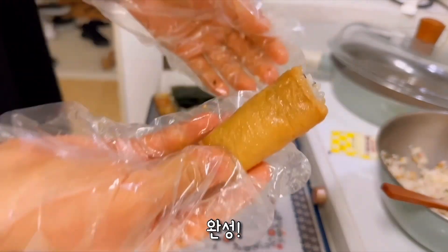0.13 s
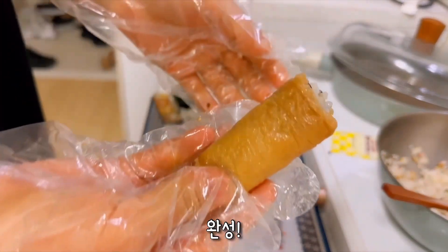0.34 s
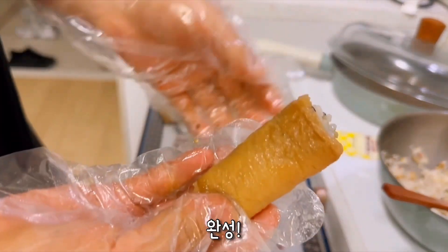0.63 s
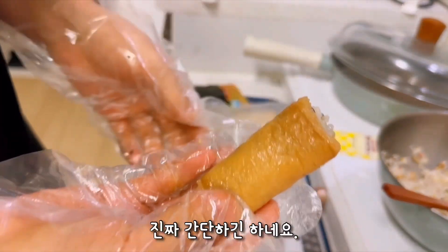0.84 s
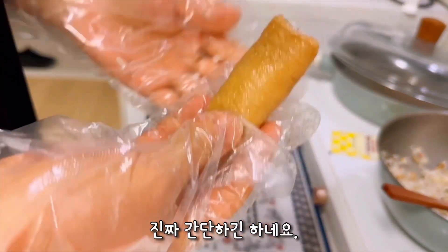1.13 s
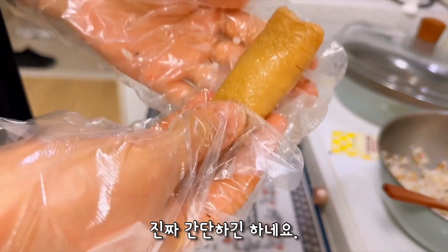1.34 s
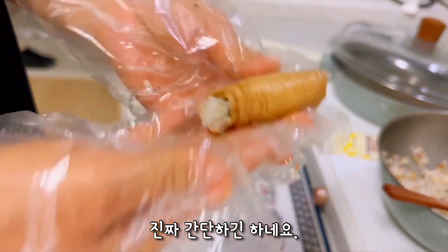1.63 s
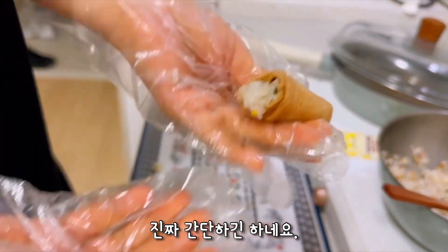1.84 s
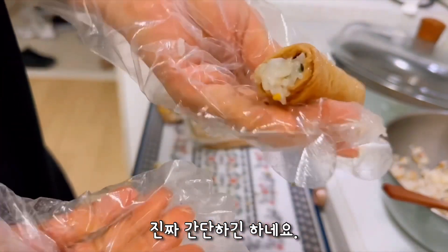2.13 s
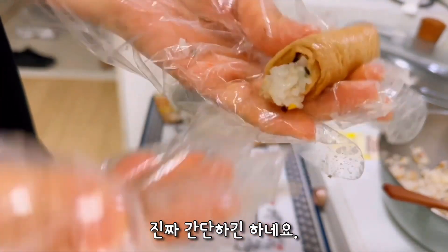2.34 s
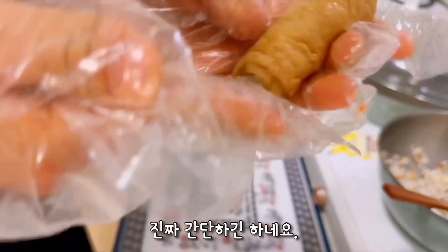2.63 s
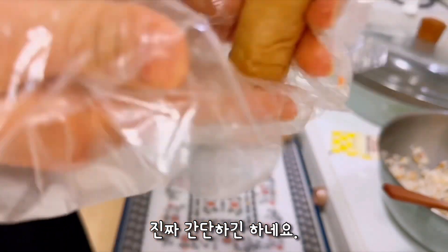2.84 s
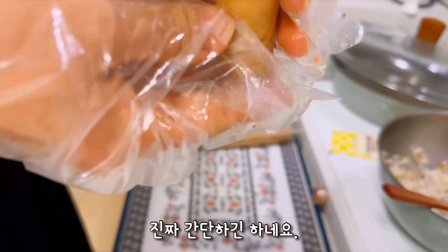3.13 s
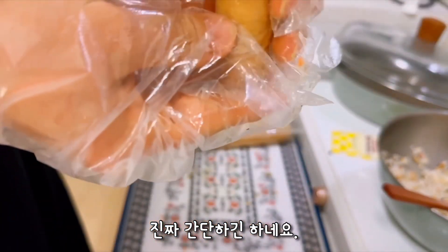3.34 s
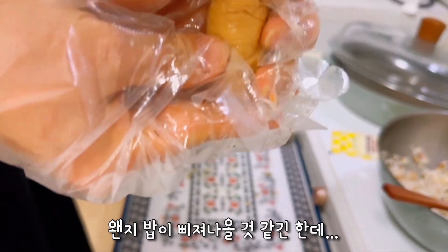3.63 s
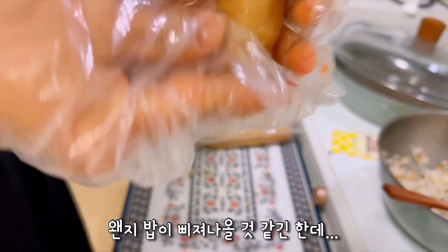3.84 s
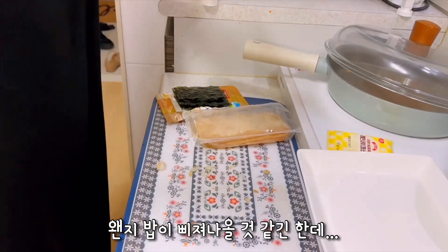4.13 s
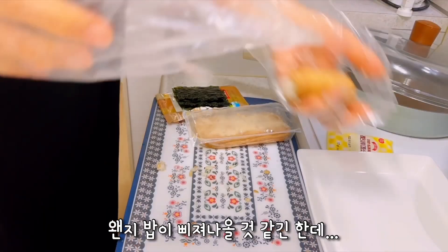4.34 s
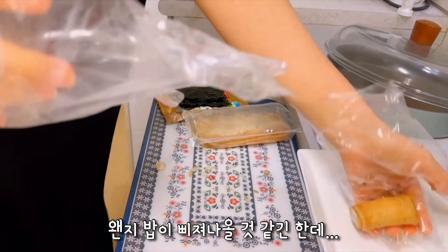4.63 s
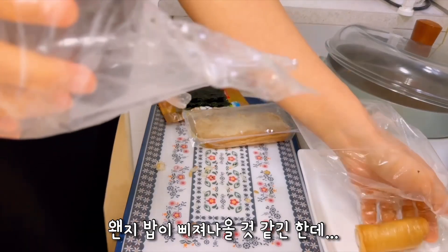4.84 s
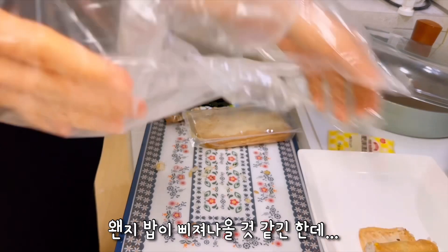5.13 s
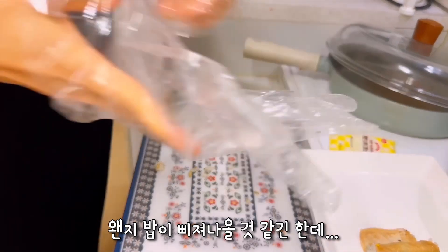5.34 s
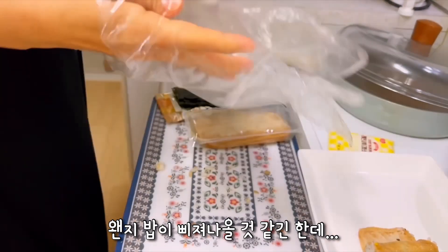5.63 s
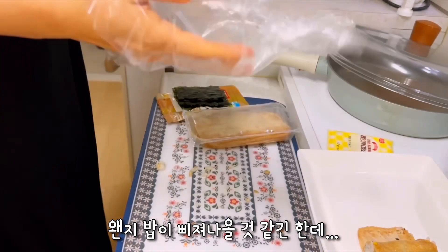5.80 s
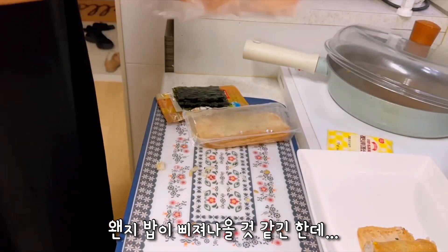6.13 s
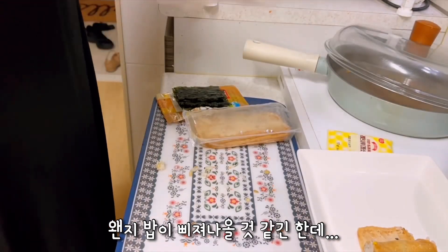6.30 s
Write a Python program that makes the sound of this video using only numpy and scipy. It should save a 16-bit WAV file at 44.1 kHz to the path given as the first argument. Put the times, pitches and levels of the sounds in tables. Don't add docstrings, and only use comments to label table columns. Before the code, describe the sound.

Thin disposable plastic gloves crinkle and snap close by in uneven bursts, with soft air puffs, a dull plate knock and a faint low kitchen rumble.

```python
import sys
import numpy as np
from scipy import signal
from scipy.fft import rfft, irfft, next_fast_len
from scipy.io import wavfile

SR = 44100
rng = np.random.default_rng(int(sys.argv[2]) if len(sys.argv) > 2 else 0)


def to_linear_factor(level_db):
    exponent = np.asarray(level_db, float) / 20
    return 10 ** exponent


def file_out(sig):
    cols = np.atleast_2d(sig).T
    lim = np.clip(cols, -1, 1)
    pcm = np.round(lim * 32767).astype(np.int16)
    wavfile.write(sys.argv[1], SR, pcm)


N = 284886


def rms_one(x):
    return x / np.sqrt(np.mean(x ** 2) + 1e-20)


def in_time(rows):
    s, *columns = np.transpose(rows)
    return [np.interp(np.arange(N) / SR, s, c) for c in columns]


def at_hz(points, hz, column=1):
    points = np.array(points)
    return np.interp(np.log(hz), np.log(points[:, 0]), points[:, column])


def ring(clicks, hz, t60):
    r, w = to_linear_factor(-60 / (t60 * SR)), 2 * np.pi * min(hz, .45 * SR) / SR
    return signal.lfilter([0, np.sin(w)], [1, -2 * r * np.cos(w), r * r], clicks + 1e-18)


def sides(pan_db):
    return to_linear_factor(np.multiply.outer([.5, -.5], pan_db))


# f/Hz, density level/dB per Hz
HOUSE_SPECTRUM = [(22, -50), (36, -19), (50, -8), (74, 1.5), (113, -4.5), (150, -21.5), (300, -23),
                  (700, -30), (1500, -36.5), (2500, -36), (5000, -50), (7500, -38), (10000, -72),
                  (15000, -57)]
# f/Hz, correlation/1
LIKENESS = [(40, 1), (250, 0.91), (700, 0.24), (2000, 1), (5800, 0.1), (8200, 1), (9300, 0.97), (11700, 1),
            (13400, 1), (14800, 0.99)]


def house():
    edges = 20 * 2 ** np.arange(0, 9.8, .5)
    white = rng.standard_normal((2, 2, N + 8000))
    out = 0
    for k, (low, high) in enumerate(zip(edges, edges[1:])):
        band = signal.butter(2, [low, high], "band", fs=SR, output="sos")
        mid, side = signal.sosfilt(band, white[k % 2])[:, -N:]
        hz = np.sqrt(low * high)
        alike = np.clip(at_hz(LIKENESS, hz), -1, 1) * (hz < 3000)
        noise = np.sqrt(1 + alike) * mid + np.sqrt(1 - alike) * side * [[1], [-1]]
        out = out + to_linear_factor(at_hz(HOUSE_SPECTRUM, hz)) * noise
    return to_linear_factor(-61) * rms_one(out)


# peak t/s, crinkle level/dB, rise/s per 10 dB, fall/s per 10 dB
MOVES = [(.06, -72.5, .04, .11), (.22, -73, .03, .07), (.86, -80, .4, .05), (.91, -59.5, .01, .04),
         (1.03, -49.5, .05, .08), (1.22, -51.5, .04, .09), (1.44, -45, .09, .17), (1.66, -43.5, .03, .17),
         (1.85, -57, .1, .05), (2.18, -61, .13, .05), (2.4, -48.5, .1, .9), (2.63, -51, .025, .035),
         (3.55, -50.5, .1, .04), (3.84, -42, .1, .09), (4.02, -41.5, .03, .16), (4.26, -53, .4, .065),
         (4.48, -63, .35, .1), (4.61, -60, .03, .3), (4.75, -51, .15, .21), (5.15, -51.5, .25, .24),
         (5.46, -43, .09, .12), (5.73, -41, .043, .19), (5.99, -42, .14, .085), (6.11, -44, .053, .2),
         (6.33, -40, .07, .3)]
# start t/s, length/s, crinkle level/dB
ROLLS = [(2.2, .18, -52), (2.71, .06, -55), (2.77, .23, -51.5), (3.04, .08, -51), (3.14, .18, -47.5),
         (3.35, .13, -54), (3.655, .13, -52), (3.8, .1, -43.5), (3.99, .08, -42), (5.56, .11, -52.5),
         (1.4, .15, -46), (1.63, .08, -44.5), (6.3, .12, -41), (5.71, .08, -42.5)]


def hands():
    still_db, let_go_s, roll_edge_s = -92, 2.6, .03
    t = np.arange(0, N / SR + .002, .002)
    level_db = np.full(len(t), float(still_db))
    for s, peak_db, rise_s, fall_s in MOVES:
        cut = np.maximum(t - let_go_s, 0) / .012 * (s < let_go_s)
        away = np.maximum((s - t) / rise_s, (t - s) / fall_s)
        level_db = np.maximum(level_db, peak_db - 10 * (away + cut))
    for s, length_s, hold_db in ROLLS:
        outside_s = np.maximum(np.maximum(s - t, t - s - length_s), 0)
        level_db = np.maximum(level_db, hold_db - 10 * outside_s / roll_edge_s)
    return np.interp(np.arange(N) / SR, t, level_db)


def avalanches(per_s, dying_s):
    trips = (rng.random(N) < per_s / SR) * rng.exponential(1, N)
    surge = signal.lfilter([1], [1, -np.exp(-1 / (dying_s * SR))], trips)
    return surge / surge.mean()


# f/Hz, level/dB
FILM = [(150, -2.5), (300, 0.5), (670, -6), (1200, -2), (1700, 0.5), (2170, -4), (3000, 2), (5500, -2.5),
        (9000, -7), (12000, -7.5), (15000, -4)]
# t/s, level/dB
TENSION = [(.06, 12), (.2, -8), (.4, -18), (.88, 5), (1.2, -6), (1.55, 8), (1.8, 6), (2.08, -8), (2.3, -3),
           (2.67, -8), (3.3, 3), (3.5, -4), (3.84, 9), (4.05, -6), (4.4, -2), (4.9, -10), (5.45, -8),
           (6.34, 5)]
# t/s, lift level/dB
CUPPING = [
    (2.95, -3),
    (3.15, 8.5),
    (3.6, 7),
    (3.9, 3),
    (4.2, -1.5),
]


def creases():
    level_db, (taut_db,), (cupping_db,) = hands(), in_time(TENSION), in_time(CUPPING)
    bright_db = .05 * (level_db + 50) - 6.5 + .4 * taut_db
    dull_db = -.1 * (level_db + 50) - 9.5 - .6 * taut_db
    speed = to_linear_factor(.25 * (level_db + 50))
    showers = .3 + .7 * avalanches(per_s=150, dying_s=.004)
    sizes = to_linear_factor(1.83 * np.minimum(rng.exponential(1, N), 3.5)) * rng.choice([-1, 1], N)
    sizes *= (rng.random(N) < 7000 * speed * showers / SR) / np.sqrt(speed)
    aside = rng.standard_normal(N) * [[1], [-1]]
    dealt = rng.integers(0, 18, N)
    out = 0
    for k, hz in enumerate(np.geomspace(150, 15500, 26)):
        alike = np.clip(at_hz(LIKENESS, hz), 0, 1)
        clicks = sizes * (dealt == k % 18) * (np.sqrt(1 + alike) + np.sqrt(1 - alike) * aside)
        share_db = (bright_db + 5.5) * (hz > 8500) + (dull_db + 11) * (hz < 1200)
        share_db = share_db + cupping_db * np.exp(-(np.log(hz / 1530) / .14) ** 2)
        grain = rms_one(ring(clicks, hz, (3.76 + hz / 1200) / hz))
        out = out + grain * to_linear_factor(share_db + at_hz(FILM, hz)) * np.sqrt(hz / 15000)
    return out * to_linear_factor(level_db - 3.0)


# t/s, peak level/dB, low body level/dB
TICKS = [(.902, -40, 6), (.9756, -39, 1), (1.1066, -33.5, 7), (1.1957, -34.5, 9), (1.838, -28, -1),
         (1.861, -31, -18), (2.0514, -32, -19), (2.2042, -20, -11), (2.2393, -21, -20), (2.3298, -24, -14),
         (2.3547, -26, 12.5), (2.3721, -24, -3), (2.4207, -27, -16), (2.456, -24.5, -16),
         (2.6211, -21, -24), (2.8916, -26, 5), (2.9427, -25.5, -12), (3.0313, -24, -16), (3.177, -23, -13),
         (3.2551, -23.5, -25), (3.3179, -25, -11), (3.397, -25, -2), (3.687, -23, -30), (3.9904, -15, -20),
         (4.7444, -18, -26), (5.1124, -30.5, -6), (5.1996, -32, 10), (5.2143, -30.5, 4), (5.7282, -17, 7.5),
         (5.7585, -19, -19)]
# t/s, peak level/dB
MORE_TICKS = [(1.2295, -31), (1.4063, -29), (1.5299, -28.5), (1.5423, -31), (1.6, -36), (2.2234, -33),
              (2.4821, -28.5), (2.581, -30.5), (3.0606, -30), (1.9172, -42), (3.2932, -27), (1.2654, -36),
              (3.5676, -33), (3.5793, -32.5), (3.7179, -31.5), (3.7492, -29), (3.9019, -24.5),
              (3.911, -27), (3.953, -31), (3.9608, -29), (4.1112, -31), (4.2217, -37), (5.297, -33),
              (5.3424, -37.5), (5.3693, -34), (5.3923, -30), (5.4943, -29.5), (5.6795, -34), (5.7958, -32),
              (6.1455, -27)]
# t/s, peak level/dB, f/Hz, low body level/dB
FOLDS = [(.2119, -43, 1450, 10), (.549, -66, 1420, 23), (1.0175, -23, 4600, -5), (1.1824, -37.5, 5550, 14),
         (1.2246, -29, 4500, 8), (1.4, -26, 5070, -6), (1.5735, -30, 5770, -10), (1.8876, -32, 4660, -19),
         (1.9563, -40.5, 2970, 1), (2.024, -35, 3100, 0), (2.0838, -37.5, 3790, -17),
         (2.132, -35, 2830, -16), (2.1537, -38, 3500, 10), (2.1976, -24.5, 5060, -17),
         (2.284, -31.5, 1860, 9), (2.303, -28.5, 4350, 5), (2.3959, -20.5, 3440, -7),
         (2.5402, -28, 5700, -22), (2.6407, -27, 2890, -10), (2.7379, -30, 3800, -4),
         (2.9487, -28, 2710, -21), (3.0224, -28.5, 3780, -20), (3.0646, -26, 6600, -23),
         (3.094, -21.5, 4300, -22), (3.3624, -30.5, 1570, -9), (3.659, -33.5, 3270, -22),
         (4.4183, -41, 4040, 8), (4.4931, -38, 1230, 14), (4.8422, -34, 2250, -3), (5.1385, -30.5, 6100, 2)]


def buckles(count):
    tick_hz, stray_body_db = 10600, -3
    luck, chance = rng.standard_normal((count, 2)), rng.random((count, 3))
    s = 1 + chance[:, 0] * (N / SR - 1.05)
    stray_hz = np.where(chance[:, 1] < .3, tick_hz, 1500 * 4 ** chance[:, 2])
    stray_db = hands()[(s * SR).astype(int)] + 13.5 + 2.5 * luck[:, 0]
    strays = np.column_stack([s, stray_db, stray_hz, stray_body_db + 8 * luck[:, 1]])
    ticks = [(s, db, tick_hz, low_db) for s, db, low_db in TICKS]
    further = [(s, db, tick_hz, stray_body_db) for s, db in MORE_TICKS]
    rows = np.array(ticks + further + FOLDS + list(strays))
    detune, pan = rng.standard_normal((len(rows), 2)).T
    rows[:, 2] *= 1 + .07 * detune * (rows[:, 2] == tick_hz)
    return np.column_stack([rows, 2.2 + 3.0 * pan])


def snaps():
    length = 900
    out, t = np.zeros((2, N + length)), np.arange(length) / SR
    rows = buckles(count=110)
    noise = rng.standard_normal((len(rows), 3, length))
    body = signal.butter(2, [900, 4500], "band", fs=SR, output="sos")
    uneven = signal.butter(2, 7500, fs=SR, output="sos")
    for (s, peak_db, hz, low_db, pan_db), (common, *own) in zip(rows, noise):
        after = .13 * to_linear_factor(.4 * np.clip(low_db + 10, -12, 10))
        shape = np.exp(-t / .00045) + after * np.exp(-t / .004)
        shock = (common + .45 * signal.sosfilt(uneven, own)) * shape
        crease = ring(shock, hz, (6.0 + hz / 1600) / hz) + 1.93 * np.diff(shock, prepend=0)
        late = np.pad(signal.sosfilt(body, shock), ((0, 0), (18, 0)))[:, :length]
        snap = crease / np.abs(crease).max() + to_linear_factor(low_db - 16) * late / np.abs(late).max()
        i = round(s * SR)
        out[:, i:i + length] += to_linear_factor(peak_db + 2.0) * sides(pan_db - .5)[:, None] * snap
    return out[:, :N]


# t/s, peak level/dB, f/Hz, length/s
PUFFS = [(1.012, -58, 130, 0.058), (1.507, -48, 110, 0.074), (1.784, -50, 121, .05),
         (2.356, -42, 137, 0.044), (2.877, -45, 106, 0.14), (3.257, -49, 120, .08),
         (3.697, -43.5, 180, 0.022), (3.885, -46, 119, 0.11), (4.06, -43.5, 107, 0.15),
         (4.426, -49, 320, 0.023), (5.456, -44, 210, 0.032), (5.742, -39.5, 142, 0.061),
         (5.923, -43, 170, 0.034), (6.141, -40, 110, 0.083), (6.34, -45, 119, .08)]


def puffs():
    out, t = np.zeros(N), np.arange(N) / SR
    white = rng.standard_normal(N)
    for s, peak_db, hz, length_s in PUFFS:
        near = slice(round((s - .2) * SR), round((s + .2) * SR))
        band = signal.butter(2, [hz / 2.4, hz * 2.2], "band", fs=SR, output="sos")
        low = rms_one(signal.sosfilt(band, white[near]))
        out[near] += to_linear_factor(peak_db - 6) * low * np.exp(-((t[near] - s) / (.5 * length_s)) ** 2)
    return out


# t/s, peak level/dB, edge tick level/dB
KNOCKS = [(4.418, -59, -9), (4.492, -74, 15), (4.651, -42, 5), (4.66, -34, -18), (4.695, -42.5, -12),
          (4.721, -64, -12), (4.903, -48, -2), (4.923, -45, 15.5), (4.934, -32.5, -19), (4.973, -38, -20),
          (5.02, -41.5, -20), (5.072, -54, -12)]
# f/Hz, level/dB, t60/s
PLATE_BODY = [(197, -31, .1), (250.2, -1.5, 0.18), (274, -5, 0.24), (315, -10.5, 0.19), (433, -13, 0.11)]
# f/Hz, level/dB, t60/s
PLATE_RIM = [(682, 2.5, 0.067), (860, 9, 0.025), (1018, 4, 0.046), (1340, -4, .04)]


def plate():
    s, peak_db, tick_db = np.transpose(KNOCKS)
    out = np.zeros(N)
    parts = (PLATE_BODY, peak_db, 300), (PLATE_RIM, peak_db + tick_db - 13, 2500)
    for modes, blow_db, contact_hz in parts:
        soft = signal.butter(2, contact_hz, fs=SR)
        for hz, level_db, t60 in modes:
            clicks = np.zeros(N)
            clicks[(s * SR).astype(int)] = to_linear_factor(blow_db + level_db)
            out += ring(signal.lfilter(*soft, clicks), hz, t60)
    return out


def drift(rate):
    r = np.exp(-40 * np.pi * rate / SR)
    slow = signal.lfilter([1], [1, -2 * r, r * r], rng.standard_normal(N // 20 + 2002))[2000:]
    return np.interp(np.arange(N) / 20, np.arange(len(slow)), rms_one(slow))


# t/s, f/Hz, level/dB
SQUEAK = [
    (4.43, 12400, -95),
    (4.48, 12750, -80),
    (4.54, 12500, -79),
    (4.6, 11600, -83),
    (4.62, 11400, -95),
]


def squeak():
    hz, level_db = in_time(SQUEAK)
    t = np.arange(N) / SR
    blowing = (t > SQUEAK[0][0]) & (t < SQUEAK[-1][0])
    phase = 2 * np.pi * np.cumsum(hz * (1 + .0055 * drift(60))) / SR
    return blowing * to_linear_factor(level_db + 3.0 * drift(30)) * np.sin(phase)


def kitchen(x):
    t60_s, wall_cut_hz = .15, 6500
    t = np.arange(SR // 2) / SR
    common, own = rng.standard_normal((2, len(t))) * to_linear_factor(-60 * t / t60_s) * (t > .003)
    own = signal.sosfilt(signal.butter(4, wall_cut_hz, fs=SR, output="sos"), own)
    no_bass = signal.butter(2, 350, "high", fs=SR, output="sos")
    tail = signal.sosfilt(no_bass, .8 * common + own * [[1], [-1]])
    tail = tail / np.sqrt(np.sum(tail ** 2) / 2)
    return signal.fftconvolve(x[None], tail, axes=1)[:, :N]


def scene():
    near = creases() + snaps() + puffs() + plate() + squeak()
    return near + to_linear_factor(-9.5) * kitchen(near.mean(axis=0)) + house()


# f/Hz, phase by which left leads/rad, left-right level/dB
PORTS = [(60, 0, 2), (1000, -.2, 4), (3300, 1.0, 3), (5600, -.2, 5), (7000, 1.3, 2), (8100, 2.9, 1),
         (9300, 1.4, 0), (11000, .1, 0), (13300, -.15, 0), (15500, -2.4, 0)]


def two_ports(x):
    size = next_fast_len(N + 4096)
    hz = np.maximum(np.arange(size // 2 + 1) * SR / size, 1)
    turn = np.exp(np.multiply.outer([.5j, -.5j], at_hz(PORTS, hz)))
    return irfft(rfft(x, size) * sides(at_hz(PORTS, hz, column=2)) * turn, size)[:, :N]


# f/Hz, width/Hz, level/dB
PORT_RESONANCES = [
    (8700, 4000, 4.5),
    (10430, 1700, 3.5),
]


def port_resonances(x):
    for hz, width_hz, gain_db in PORT_RESONANCES:
        r, w = np.exp(-np.pi * width_hz / SR), 2 * np.pi * hz / SR
        top, bottom = [(1 - r * r) / 2, 0, (r * r - 1) / 2], [1, -2 * r * np.cos(w), r * r]
        x = x + (to_linear_factor(gain_db) - 1) * signal.lfilter(top, bottom, x)
    return x


def band_limit(x):
    return signal.sosfilt(signal.butter(12, 16820, fs=SR, output="sos"), x)


def record(dry):
    x = port_resonances(two_ports(dry))
    x = .45 * np.tanh(x / .45)
    mix = signal.sosfilt(signal.cheby2(10, 32, 16000, fs=SR, output="sos"), x)
    return band_limit(mix)


dry = scene()
out = record(dry)
file_out(out)
```